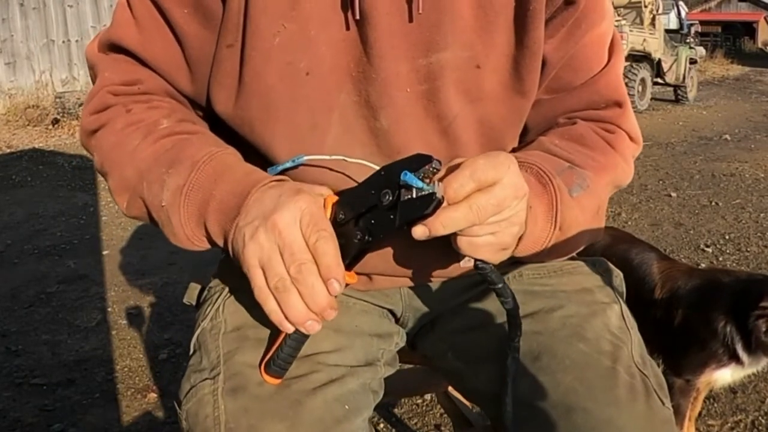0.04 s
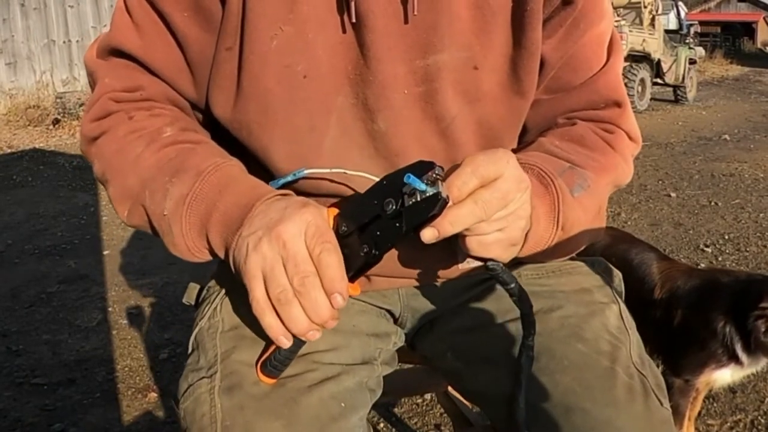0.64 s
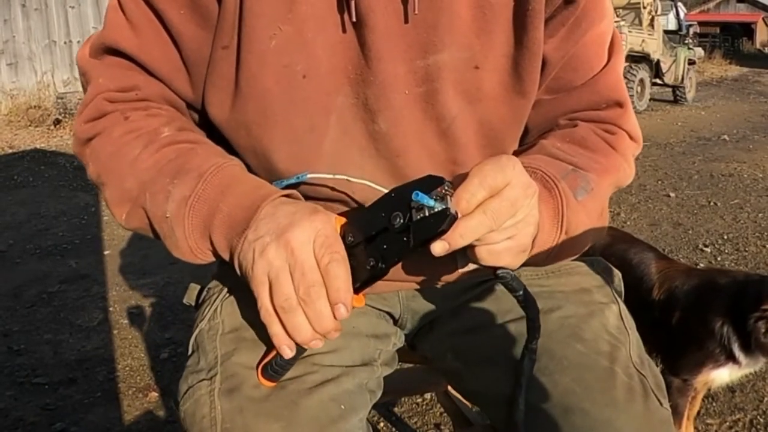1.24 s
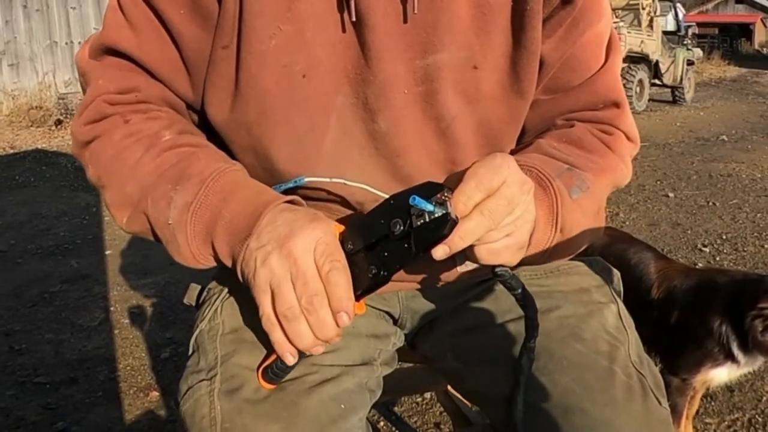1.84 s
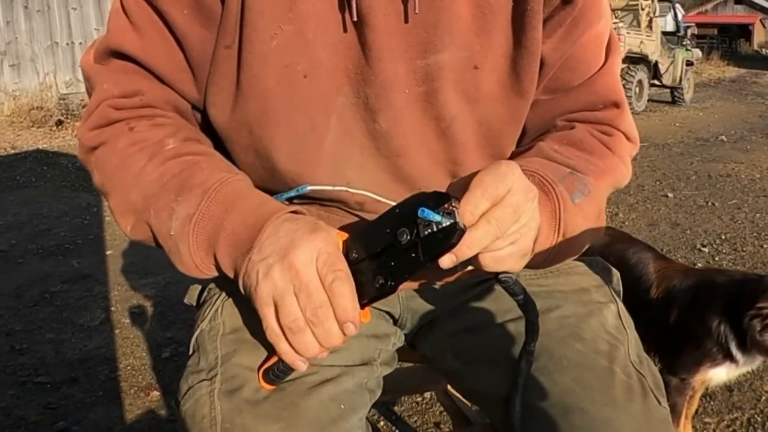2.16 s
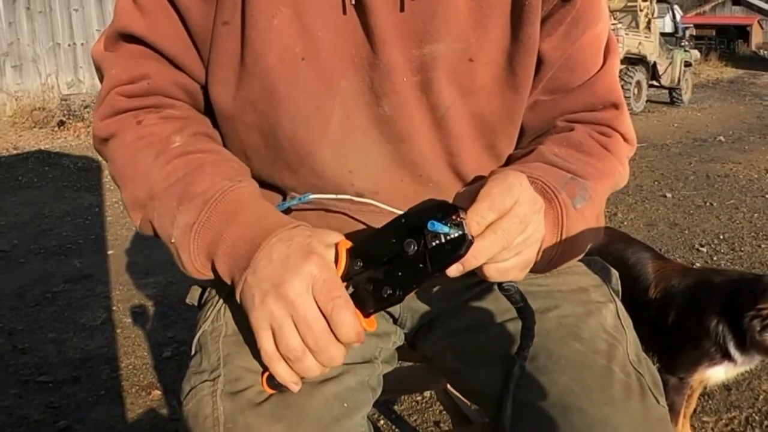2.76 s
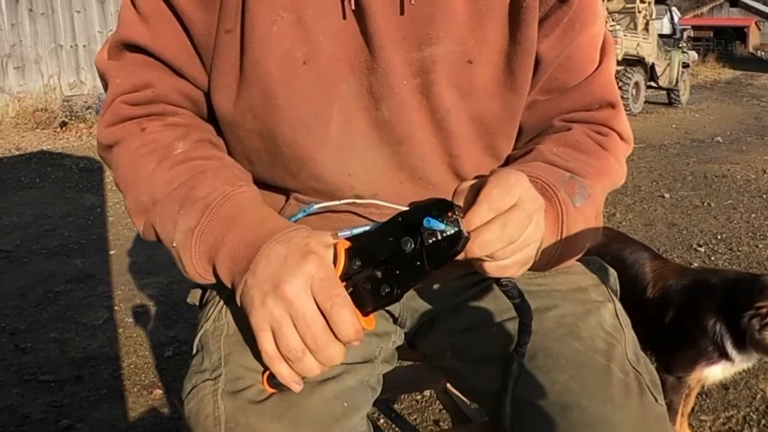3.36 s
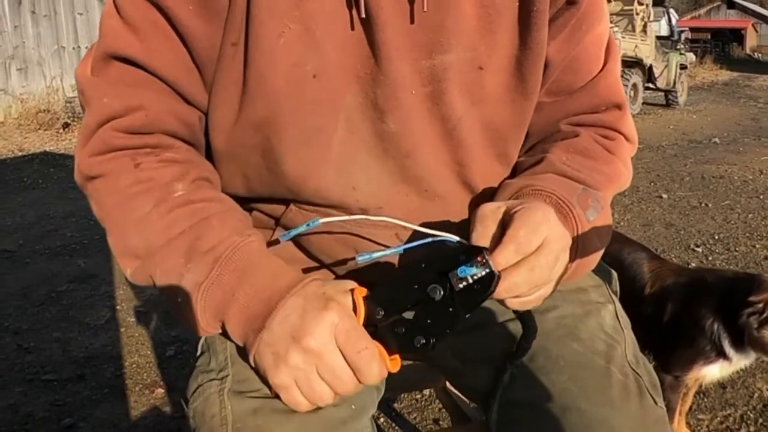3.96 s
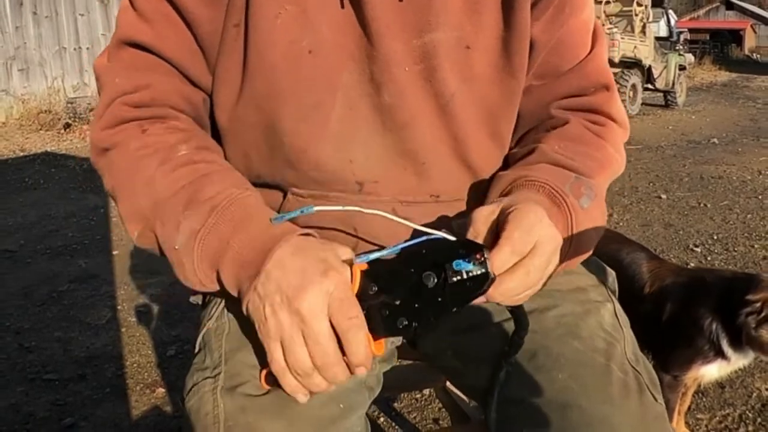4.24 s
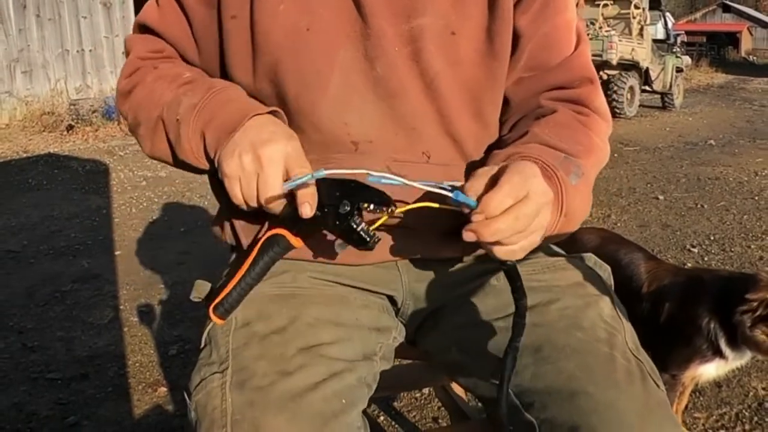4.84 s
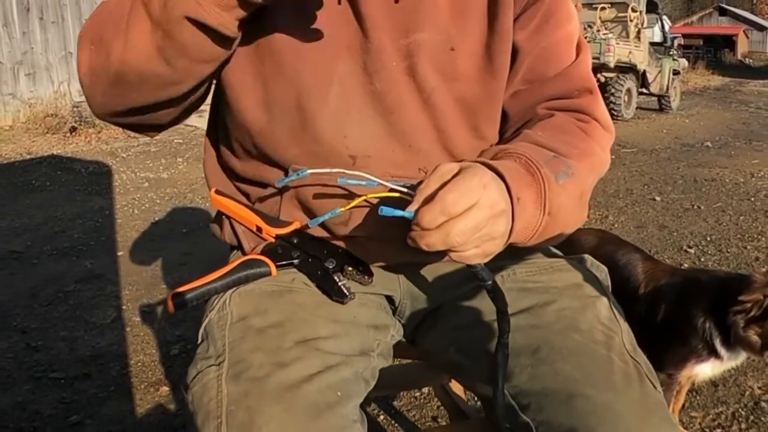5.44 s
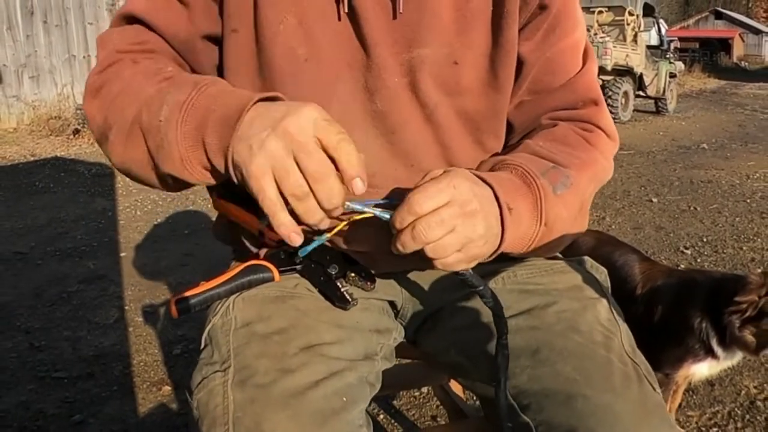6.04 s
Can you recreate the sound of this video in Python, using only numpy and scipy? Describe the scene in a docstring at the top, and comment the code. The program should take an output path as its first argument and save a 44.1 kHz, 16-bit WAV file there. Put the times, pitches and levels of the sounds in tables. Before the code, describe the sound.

Outdoors, wind rumbles softly on a nearby microphone while a hand crimping tool is squeezed one tooth at a time. Five slow, lightly ringing clicks are followed by five quicker ones. A short creak leads into a zipping ratchet release and a few metallic knocks as the tool is laid down. Clothing brushes past, and a low handling thump and a few softer bumps finish it.

```python
"""Air rumbles low on the microphone, outdoors; close by, a ratcheting crimper clicks shut on a connector.
Each drop of the pawl is an impact that excites the tool's modes and plucks a spring into free vibration.
Sleeves and palm make friction noise. The jaws creak by stick-slip, the handles fly open, the pawl rasps
back over the rack and the loose tool rattles. Last come the dull thumps of handling."""
import sys
import numpy as np
from scipy import signal
from scipy.fft import rfft, irfft, next_fast_len
from scipy.io import wavfile
from scipy.ndimage import uniform_filter1d

SR = 44100
rng = np.random.default_rng(int(sys.argv[2]) if len(sys.argv) > 2 else 0)


def generate_wav(signal):
    """Clip the signal to [-1, 1] and save it as 16-bit WAV at the path in sys.argv[1]."""
    frames = np.transpose(np.atleast_2d(signal))
    scaled = np.clip(frames, -1, 1) * 32767
    pcm = np.round(scaled).astype(np.int16)
    wavfile.write(sys.argv[1], SR, pcm)


N = 268965
TIME = np.arange(N) / SR


def from_db(db):
    """Amplitude ratio of a level in decibels."""
    return 10 ** (np.asarray(db) / 20)


def unit_rms(x):
    """Normalisation to rms 1."""
    return x / np.sqrt(np.mean(x ** 2) + 1e-30)


def unit_energy(x):
    """Normalisation to energy 1."""
    return x / np.sqrt(np.sum(x ** 2) + 1e-30)


def cut(x, hz, kind, order=2):
    """Causal Butterworth filtering."""
    return signal.sosfilt(signal.butter(order, hz, kind, fs=SR, output="sos"), x)


def add(out, s, sound):
    """Superposition of a sound that starts at time s."""
    at = max(round(s * SR), 0)
    out[at:at + len(sound)] += sound[:N - at]


def noise(spectrum):
    """Spectral shaping of white noise, falling steeply past the last point; rms 1."""
    hz, db = np.transpose(spectrum)
    size = next_fast_len(N)
    bin_hz = np.arange(size // 2 + 1) * SR / size + 1
    gain = from_db(np.interp(np.log(bin_hz), np.log(hz), db)) / np.maximum(bin_hz / hz[-1], 1) ** 4
    return unit_rms(irfft(rfft(rng.standard_normal(size)) * gain, size)[:N])


def evened(x, span_s):
    """Division by the running rms steadies the level of a noise."""
    return x / np.sqrt(uniform_filter1d(x ** 2, int(span_s * SR)) + 1e-3)


def resonate(x, hz, width_hz):
    """Forced response of one mode, with gain 1 at resonance."""
    r = np.exp(-np.pi * width_hz / SR)
    numerator = np.array([1, 0, -1]) * (1 - r * r) / 2
    return signal.lfilter(numerator, [1, -2 * r * np.cos(2 * np.pi * hz / SR), r * r], x)


def ring(hz, t60, length_s):
    """Free vibration of one damped mode."""
    t = TIME[:int(length_s * SR)]
    return np.sin(2 * np.pi * hz * t) * from_db(-60 * t / t60)


def held(start_s, end_s, rise_s, fade_s):
    """Envelope of linear rise, plateau and exponential decay."""
    return np.clip((TIME - start_s) / rise_s, 0, 1) * np.exp(-np.maximum(TIME - end_s, 0) / fade_s)


# strength of the rumble, stirred by moving air and handling, most as the arm swings away: t/s, level/dB
BREEZE_CURVE = [(0.0, -55), (0.13, -48.5), (0.24, -43.5), (0.42, -50), (0.54, -39.5), (1.29, -49.5),
                (1.38, -49), (1.65, -52), (1.83, -40), (2.07, -46), (2.14, -33.5), (2.28, -45.5),
                (3.33, -51.5), (3.58, -42.5), (3.67, -36), (3.72, -45.5), (3.82, -39), (4.01, -50.5),
                (4.52, -38.5), (4.86, -47), (4.96, -38), (4.99, -43), (5.28, -30.5), (5.32, -21),
                (5.4, -13), (5.5, -31.5), (5.72, -28), (5.84, -28.5), (5.88, -41), (6.01, -50),
                (6.06, -42.5), (6.1, -42)]
# spectra of the deep sway and of the flutter above it: f/Hz, spectral level/dB
SWAY_SPECTRUM = [(12, -9.5), (22, 9), (45, 8), (70, -7.5), (100, -32), (160, -59)]
FLUTTER_SPECTRUM = [(45, -5), (80, 9), (120, -2.5), (170, -7.5), (230, -14.5), (320, -26), (480, -49),
                    (750, -50), (1200, -64)]

def wind(sway_db=6.5, flutter_db=-2, sway_cap_db=-25, flutter_cap_db=-20, gust_db=2.5, gust_hz=7):
    """Turbulence: air moving over the microphone makes two bands of rumble that share the same gusts."""
    breeze_db = np.interp(TIME, *np.transpose(BREEZE_CURVE))
    steps = rng.standard_normal(200)
    gusts = from_db(gust_db * np.interp(TIME * 2 * gust_hz, np.arange(len(steps)), steps))
    sway_gain = from_db(sway_db + np.minimum(breeze_db, sway_cap_db))
    flutter_gain = from_db(flutter_db + np.minimum(breeze_db, flutter_cap_db))
    sway = sway_gain * evened(noise(SWAY_SPECTRUM), span_s=0.09)
    flutter = flutter_gain * evened(noise(FLUTTER_SPECTRUM), span_s=0.078)
    return gusts * (sway + flutter)


# outdoor background: f/Hz, spectral level/dB
AIR_SPECTRUM = [(100, 11.5), (400, 9), (800, 0), (1100, -3), (1400, 1.5), (2000, -5), (2700, -5),
                (3600, -7.5), (5500, -7.5), (7000, -13), (9000, -21), (15000, -26)]

def air(level_db=-73.5):
    """Stationary broadband noise: the faint hush of open air."""
    return from_db(level_db) * noise(AIR_SPECTRUM)


def add_click(out, s, band_db, modes, slide_s, settle_s, low_hz, top_hz, vary_db=2.5):
    """Impact excitation: steel slides, snaps and settles, and its tiny contacts drive the tool's modes."""
    lead_s, middle_hz = 0.02, (2200, 5000)
    t = TIME[:4096] - lead_s
    contact = np.exp(-np.maximum(-t / slide_s, t / settle_s))
    body = np.zeros(len(t))
    for hz, width, db in modes:
        mode = unit_energy(resonate(contact * rng.standard_normal(len(t)), hz, width))
        body += from_db(db + vary_db * rng.standard_normal()) * mode   # no two contacts are alike
    body = cut(cut(body, low_hz, "high", order=3), top_hz, "low")
    # where and how hard it lands sets the balance of low, middle and high
    bands = [cut(body, middle_hz[0], "low", order=3),
             -cut(body, middle_hz, "band"),
             cut(body, middle_hz[1], "high", order=3)]
    click = sum(from_db(db) * unit_energy(band) for db, band in zip(band_db, bands))
    energy = np.sum(from_db(band_db) ** 2) * SR / 100   # band levels are rms over 10 ms
    add(out, s - lead_s, np.sqrt(energy) * unit_energy(click))


# pawl drops: t/s, low level/dB, middle level/dB, high level/dB, spring level/dB, overtone gain/dB
PAWL_DROPS = [(0.3701, -38.5, -41, -51, -70.5, 11.5), (0.7, -39.5, -41.5, -49.5, -68.5, 5.5),
              (1.0888, -42, -47.5, -47.5, -69.5, -12), (1.9417, -41.5, -44.5, -46.5, -70.5, 6),
              (2.1687, -48.5, -44, -46.5, -67, -10), (3.5628, -43, -60, -45.5, -71.5, -4),
              (3.6944, -41.5, -49, -42.5, -68, -10), (3.7674, -41, -36, -39.5, -72, -0.5),
              (3.8188, -43, -33.5, -39.5, -71, -5), (3.863, -28, -29, -38.5, -91, 5)]
# modes of the tool gripped under load: f/Hz, bandwidth/Hz, level/dB
GRIPPED_MODES = [(912, 800, -3), (1322, 120, 1.5), (1720, 230, 2.5), (1875, 190, -6.5), (2563, 35, -5),
                 (2935, 97, -6), (3340, 130, -4), (4100, 210, -2.5), (4840, 280, -5), (6090, 750, 6.5),
                 (6990, 220, -11), (7650, 620, -17.5), (11000, 4000, -30.5)]
# modes of the pawl spring, fundamental first: f/Hz, level/dB, T60/s
SPRING_MODES = [(906, 0, 1.45), (1814, 6, .66), (2735, -4, .36), (3429, -4, .22), (3628, -3, .23),
                (4260, -9, .45), (5000, -11, .45), (5728, -15, .45), (6172, -8, .42)]

def squeeze(beat_hz=9, twin_db=-1.5, pluck_db=7, pluck_s=0.053):
    """Impact and free vibration: each drop of the pawl clicks and plucks its spring anew."""
    out = np.zeros(N)
    next_drops = [row[0] for row in PAWL_DROPS[1:]] + [N / SR]
    lowest_hz, _, lowest_t60 = SPRING_MODES[0]
    for (s, *band_db, spring_db, overtones_db), until in zip(PAWL_DROPS, next_drops):
        add_click(out, s, band_db, GRIPPED_MODES,
                  slide_s=0.0034, settle_s=0.00084, low_hz=731, top_hz=12100)
        fundamental, *overtones = [from_db(db) * ring(hz, t60, until - s) for hz, db, t60 in SPRING_MODES]
        # the lowest mode swings in two planes at slightly different rates, so it beats
        twin = from_db(twin_db) * ring(lowest_hz + beat_hz, lowest_t60, until - s)
        pluck = from_db(pluck_db * np.exp(-TIME[:len(twin)] / pluck_s))   # wide first swings fade fast
        spring = pluck * (fundamental + twin) + from_db(overtones_db) * sum(overtones)
        add(out, s, from_db(spring_db) * spring)
    return out


# modes of the steel side plates: f/Hz, level/dB, T60/s
PLATE_MODES = [(1015, -9.5, 0.15), (1420, -3.5, 0.054), (1660, -14, 0.073), (1862, -10, 0.052),
               (2132, 3, 0.081), (2460, -1, 0.12), (2696, -4.5, 0.059), (3040, -2.5, 0.079),
               (3220, 3.5, 0.047), (3450, -2, 0.061), (3830, 1.5, 0.041), (3930, 1.5, 0.068),
               (4340, -8, 0.037), (4910, -1, 0.077), (5480, -14.5, 0.071), (6430, -12, 0.04),
               (6760, -5, .08), (7150, 2.5, 0.043), (7830, 0, 0.074), (8450, -0.5, 0.023), (9350, 1, 0.064),
               (10500, 5, 0.086), (11640, -2.5, 0.066)]

def plates(x, ring_db=-3):
    """Resonance: every blow leaves the side plates ringing for a moment."""
    ringing = sum(from_db(db) * resonate(x, hz, width_hz=np.log(1000) / (np.pi * t60))
                  for hz, db, t60 in PLATE_MODES)
    return x + from_db(ring_db) * ringing


def yard(x, near_db, far_db, near_t60=0.11, far_t60=0.48, far_hz=6500):
    """Diffuse reflection: quick scatter from lap and ground, and a faint tail from the sheds."""
    t = TIME[:SR]
    onset = 1 - np.exp(-t / 0.004)
    near = unit_energy(rng.standard_normal(SR) * onset * from_db(-60 * t / near_t60))
    far = unit_energy(rng.standard_normal(SR) * onset * from_db(-60 * t / far_t60))
    response = from_db(near_db) * near + from_db(far_db) * cut(far, far_hz, "low")
    return x + signal.fftconvolve(x, response)[:N]


# sleeves and wire brushing past: peak t/s, duration/s, dull level/dB, bright level/dB
BRUSH_STROKES = [(1.183, 0.48, -70.5, -79.5), (2.21, .3, -64.5, -75), (2.525, 0.28, -75, -77),
                 (3.72, 0.45, -58.5, -69.5), (4.381, 0.27, -45, -51.5), (4.56, 1.2, -60.5, -64),
                 (4.718, 0.33, -52.5, -58), (4.917, 0.29, -54.5, -57), (5.067, 0.11, -51.5, -57.5),
                 (5.18, 0.23, -53.5, -60), (5.293, 1.05, -60.5, -68), (5.688, .2, -75, -73.5),
                 (5.943, 0.19, -79, -77.5)]
# the two colours of the rubbing: f/Hz, spectral level/dB
DULL_SPECTRUM = [(180, 8.5), (350, 2), (600, 0.5), (900, -6), (1400, -1), (2100, -8), (2800, -7),
                 (3600, -23.5), (6000, -45.5)]
BRIGHT_SPECTRUM = [(1800, -23), (3200, -1.5), (4200, -0.5), (5700, 1), (6900, -5.5), (8000, -10),
                   (10000, -24), (15000, -36)]

def rustle(rise_share=0.41, edge_db=-18.5, grain_db=2, grain_hz=140):
    """Sliding friction: each brush of cloth swells, fades more slowly and rubs in tiny uneven catches."""
    dull, bright = np.zeros(N), np.zeros(N)
    for s, length_s, dull_db, bright_db in BRUSH_STROKES:
        from_peak = np.maximum((s - TIME) / rise_share, (TIME - s) / (1 - rise_share)) / length_s
        swell = from_db(edge_db * from_peak)
        dull = np.maximum(dull, from_db(dull_db) * swell)
        bright = np.maximum(bright, from_db(bright_db) * swell)
    grain = unit_rms(cut(rng.standard_normal(N), grain_hz, "low"))
    catches = unit_rms(from_db(grain_db * grain))
    return catches * (dull * noise(DULL_SPECTRUM) + bright * noise(BRIGHT_SPECTRUM))


# skin on the rubber grip: f/Hz, spectral level/dB
GRIP_SPECTRUM = [(200, -17), (320, 8.5), (450, -0.5), (620, -4), (850, -11), (1300, -15), (2200, -28)]

def palm(resting_db=-84, pressing_db=-62):
    """Friction noise: the palm rubs dully on the grip, most as it bears down for the last squeeze."""
    pressing = held(start_s=3.54, end_s=4.33, rise_s=0.34, fade_s=0.09)
    return (from_db(resting_db) + from_db(pressing_db) * pressing) * noise(GRIP_SPECTRUM)


def tilted(db, tilt_db, flanks_db):
    """Spectral tilt: low, middle and high levels of a click, pivoting on the middle."""
    return [db + flanks_db - tilt_db, db, db + flanks_db + tilt_db]


# knocks of the jaws and links: t/s, level/dB, tilt toward treble/dB, jaw ring level/dB
KNOCKS = [(3.9003, -51, -9.5, -73.5), (4.225, -72.5, -11, -71), (4.316, -56.5, 4, -72),
          (4.6011, -46.5, -1, -29), (4.6778, -51.5, -2.5, -39), (4.7120, -42.5, -10.5, -47),
          (4.7612, -54, 1.5, -69), (4.852, -62.5, 11.5, -78), (4.932, -53, -11, -75),
          (5.0036, -71, 13.5, -76), (5.0626, -47, 2.5, -80)]
# modes of the slack tool: f/Hz, bandwidth/Hz, level/dB
SLACK_MODES = [(468, 170, -8.5), (1069, 110, 1), (1300, 320, -0.5), (1770, 310, -3), (2700, 560, -13.5),
               (3720, 170, -3), (5240, 750, 2), (6460, 480, -8)]

def rattle(jaw_hz=2603, jaw_t60=0.029):
    """Impacts in loose joints: the tool knocks as it comes off the wire and is laid down."""
    out = np.zeros(N)
    for s, db, tilt_db, jaw_db in KNOCKS:
        add_click(out, s, tilted(db, tilt_db, flanks_db=-2.5), SLACK_MODES,
                  slide_s=0.0011, settle_s=0.0018, low_hz=330, top_hz=6470)
        add(out, s, from_db(jaw_db) * ring(jaw_hz, jaw_t60, length_s=0.1))
    return out


# modes of the creaking jaws: f/Hz, bandwidth/Hz, level/dB
JAW_MODES = [(1352, 130, 6.5), (1970, 300, -12.5), (2300, 400, -2), (2760, 120, 5.5)]

def creak(slips_per_s=900, level_db=-56):
    """Stick-slip: as the load comes off, dense slips of the dies on the connector ring a few modes."""
    slips = (rng.random(N) < slips_per_s / SR) * rng.standard_normal(N) + 1e-18
    body = sum(from_db(db) * resonate(slips, hz, width) for hz, width, db in JAW_MODES)
    unloading = held(start_s=4.22, end_s=4.36, rise_s=0.048, fade_s=0.01)
    return from_db(level_db) * unloading * unit_rms(cut(body, 2760, "low", order=6))


# skips of the pawl back over the rack: t/s, level/dB
PAWL_SKIPS = [(4.3727, -33.5), (4.384, -31), (4.3932, -31), (4.4015, -31.5), (4.4101, -30), (4.4184, -33.5),
              (4.428, -35), (4.4373, -31), (4.4505, -31), (4.468, -36)]
# modes of the tool as it springs open: f/Hz, bandwidth/Hz, level/dB
OPENING_MODES = [(324, 37, 2), (1080, 74, 8), (1400, 61, -6), (2070, 94, -8), (2670, 200, -1.5),
                 (3410, 96, -2.5), (4240, 270, 4), (5270, 1100, 4.5), (6320, 140, 1.5), (7010, 180, 3.5),
                 (8160, 220, 1), (12000, 3100, -25)]
# steel left singing afterwards: f/Hz, level/dB, T60/s
STEEL_MODES = [(2525, -62.5, 0.99), (3300, -65.5, 0.28), (4330, -67.5, 0.38), (6900, -55.5, 0.61),
               (8180, -62, .3), (10600, -72, .3)]

def release(first_tilt_db=2, dulling_db_per_s=89.5):
    """An impact train: the opening handles drag the pawl over ten teeth, each duller than the last."""
    out = np.zeros(N)
    first_skip_s, singing_s = PAWL_SKIPS[0][0], PAWL_SKIPS[-2][0]
    for s, db in PAWL_SKIPS:
        tilt_db = first_tilt_db - dulling_db_per_s * (s - first_skip_s)
        add_click(out, s, tilted(db, tilt_db, flanks_db=-3), OPENING_MODES,
                  slide_s=0.0005, settle_s=0.0016, low_hz=244, top_hz=11100)
    for hz, db, t60 in STEEL_MODES:
        add(out, singing_s, from_db(db) * ring(hz, t60, length_s=1))
    return out


# soft handling blows that reach the microphone: t/s, level/dB, f/Hz, low-pass cutoff/Hz
HANDLING_BLOWS = [(5.302, -6.5, 42, 151), (5.3119, -21.5, 90, 900), (5.3195, -5.5, 86.4, 327),
                  (5.328, -17.5, 138, 900), (5.355, -1.5, 108.6, 202), (5.376, -5, 121, 340),
                  (5.392, -1.5, 71.4, 262), (5.4021, -2, 153, 1200), (5.412, -4.5, 269, 1244),
                  (5.453, -14.5, 123, 370), (5.603, -22.5, 86.5, 200), (5.678, -32, 190, 626),
                  (5.807, -18.5, 106, 237), (5.829, -13.5, 77.7, 260)]
# modes of the microphone's mount: f/Hz, bandwidth/Hz, level/dB
MOUNT_MODES = [(126.2, 20.5, 9.5), (174, 28, 0), (229.3, 13, -1), (358, 62, 3), (485, 46, -3),
               (1050, 330, -12)]

def thumps(t60_cycles=3.5, scuff_db=-16, scuff_s=0.007, cloth_hz=380):
    """Structure-borne sound: soft blows ring briefly and drag, shaking the mount; harder is brighter."""
    out = np.zeros(N)
    for s, db, hz, cutoff_hz in HANDLING_BLOWS:
        blow = ring(hz, t60_cycles / hz, length_s=0.2)
        drag = cut(rng.standard_normal(len(blow)) * np.exp(-TIME[:len(blow)] / scuff_s), cloth_hz, "low")
        shaken = sum(from_db(mode_db) * unit_energy(resonate(drag, mode_hz, width))
                     for mode_hz, width, mode_db in MOUNT_MODES)
        scuff = from_db(scuff_db) * unit_energy(shaken) * np.sqrt(SR / 50)   # rms over 20 ms
        add(out, s, from_db(db) * cut(blow + scuff, cutoff_hz, "low", order=4))
    return cut(out, 27, "high", order=1)


def scene(tool_db=-1):
    """Superposition, in mono: the tool and its reflections over handling noise and moving air."""
    closing = yard(plates(squeeze()), near_db=-13, far_db=-22)
    opening = yard(plates(release() + rattle()), near_db=-16, far_db=-32)
    handling = creak() + palm() + rustle() + thumps()
    return (from_db(tool_db) * (closing + opening) + handling + wind() + air())[None]


def record(dry, cutoff_hz=15800):
    """Band limiting: an elliptic low-pass cuts the top steeply."""
    return signal.sosfilt(signal.ellip(10, 0.1, 80, cutoff_hz, fs=SR, output="sos"), dry)


dry = scene()
out = record(dry)
generate_wav(out)
```